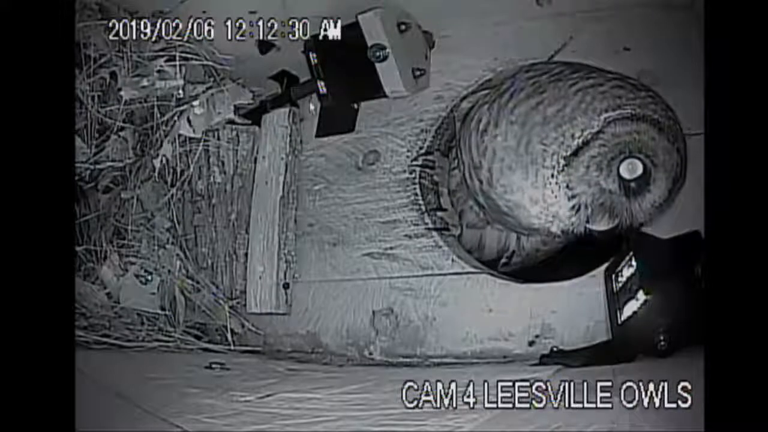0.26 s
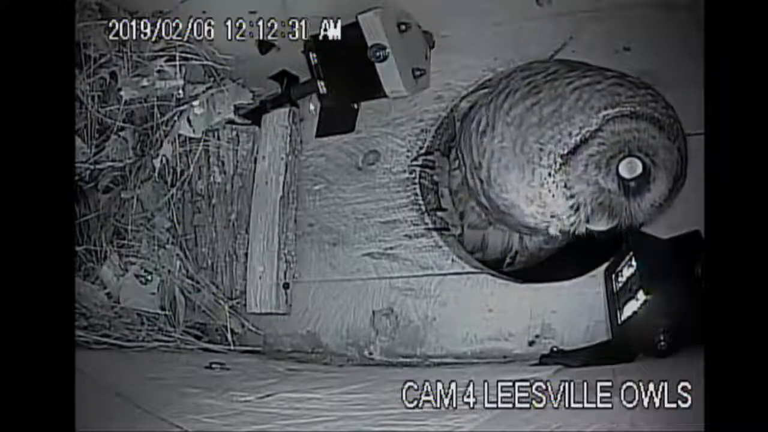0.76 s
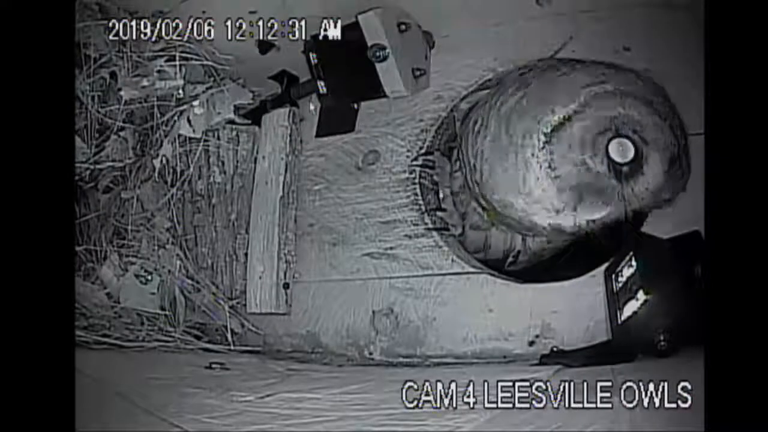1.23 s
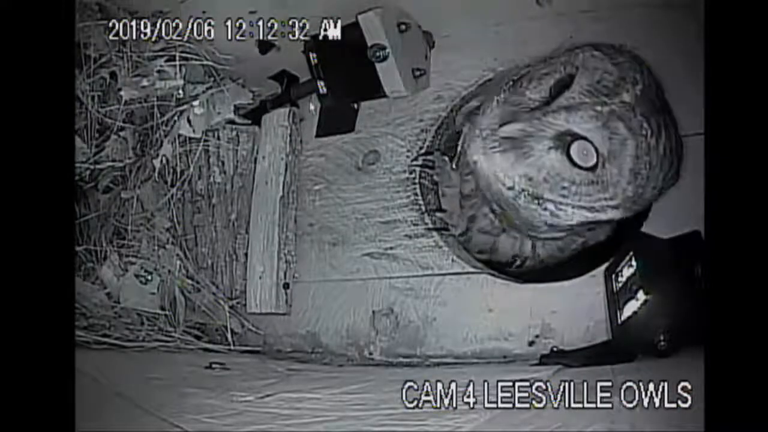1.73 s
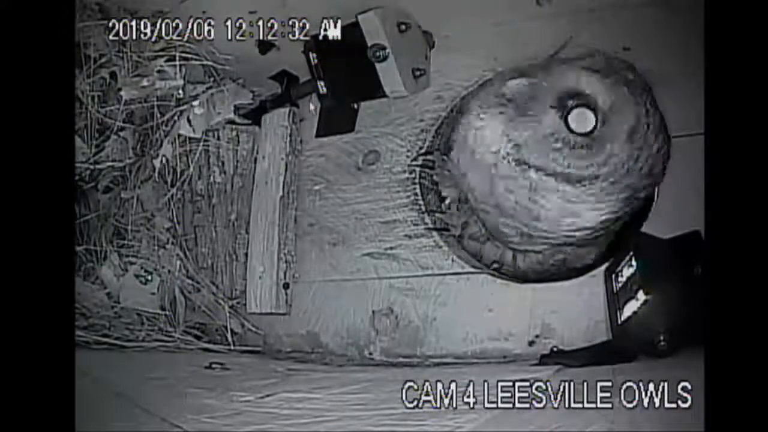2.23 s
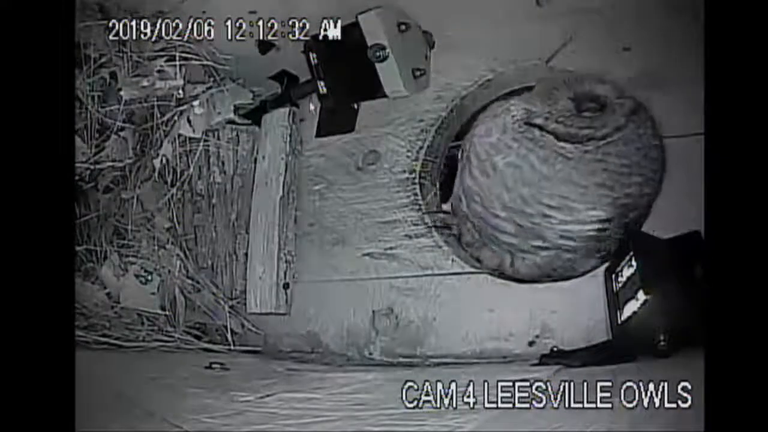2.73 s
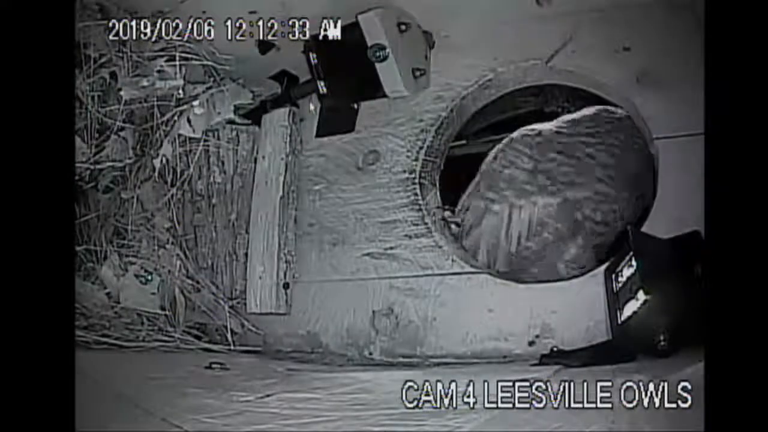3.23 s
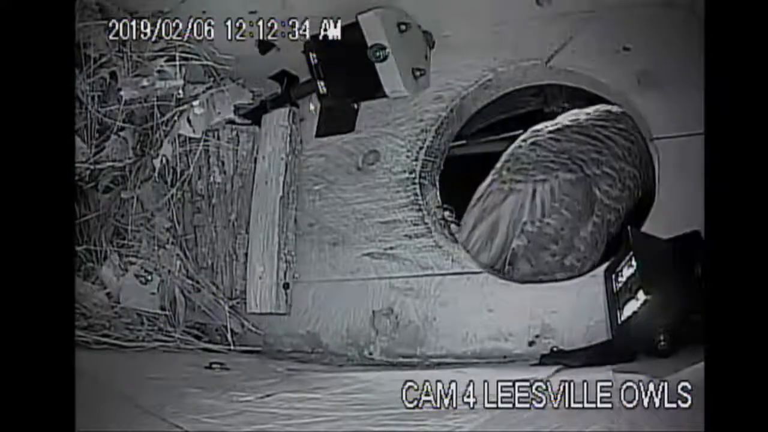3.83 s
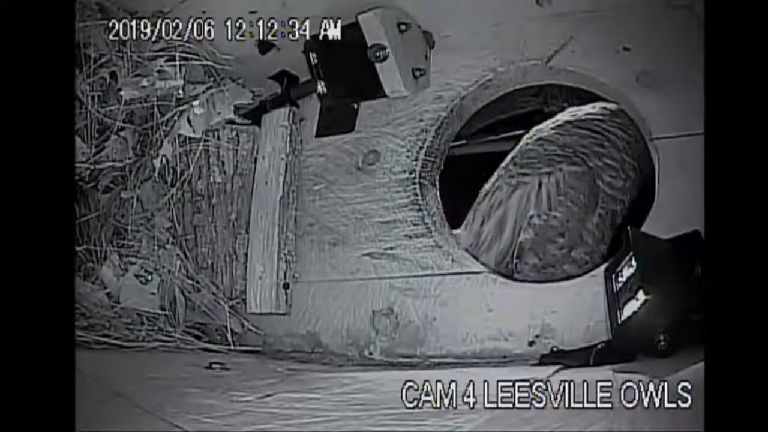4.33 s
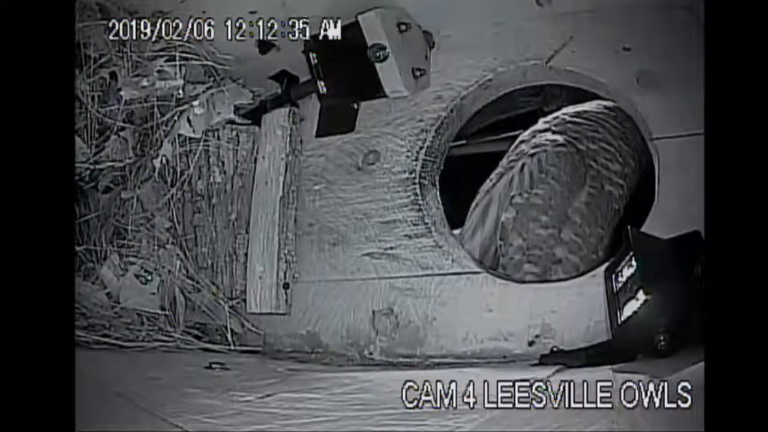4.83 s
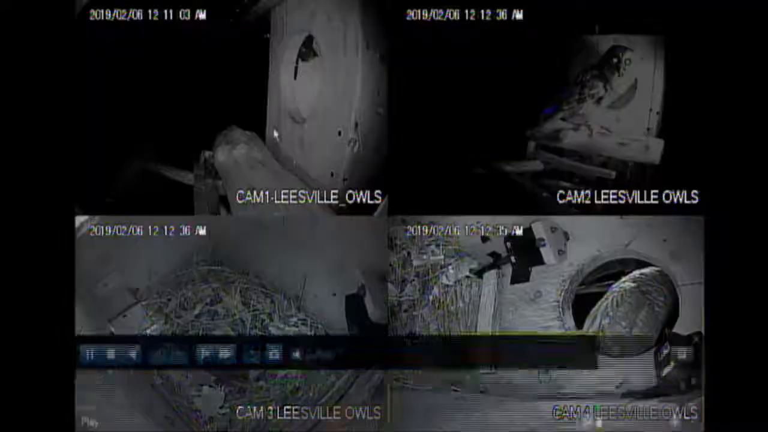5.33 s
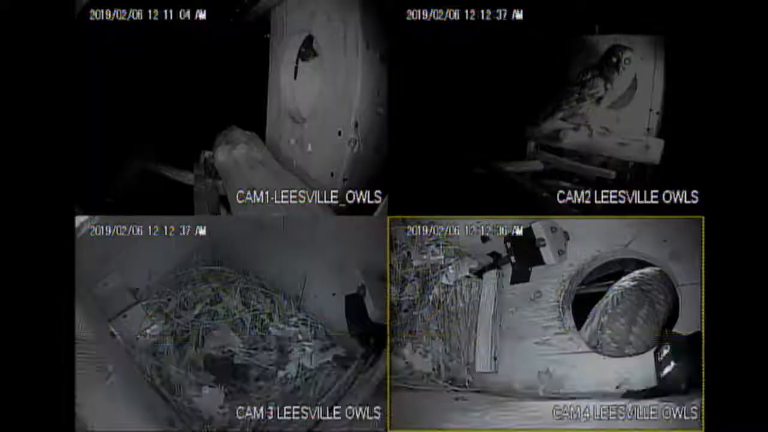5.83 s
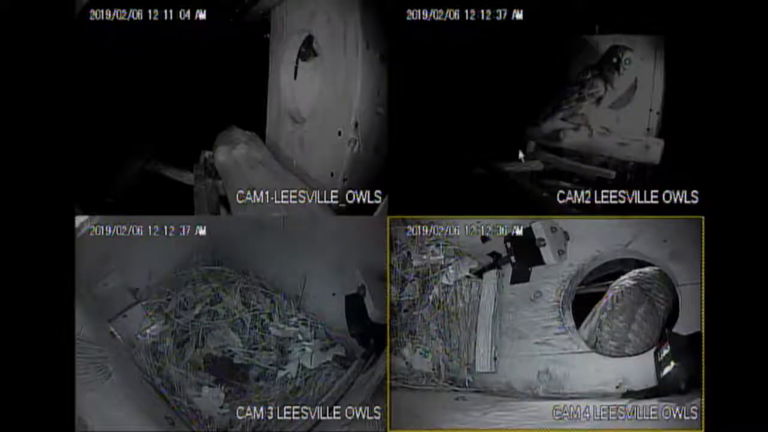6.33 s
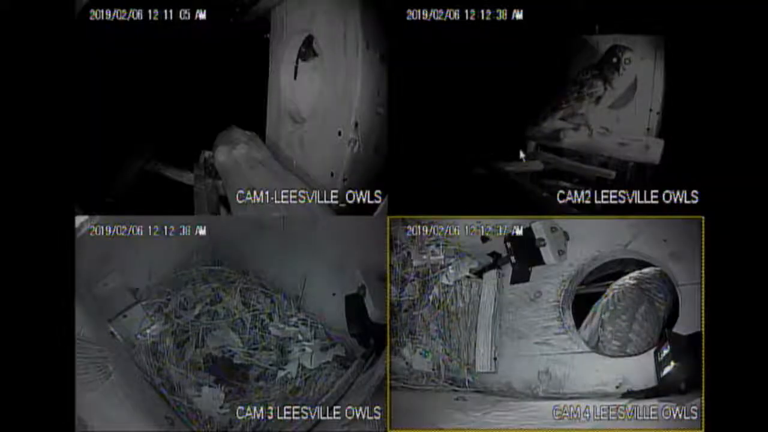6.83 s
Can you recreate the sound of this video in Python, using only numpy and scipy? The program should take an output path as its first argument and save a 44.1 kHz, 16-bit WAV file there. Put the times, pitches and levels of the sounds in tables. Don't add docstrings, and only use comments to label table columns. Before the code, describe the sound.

Loud, overloaded owl hoots in a boxy wooden space, claws knocking and scraping as it turns, then a longer, softer run of hoots outward.

```python
import sys
import numpy as np
from scipy import signal
from scipy.fft import rfft, irfft, next_fast_len
from scipy.io import wavfile
from scipy.ndimage import uniform_filter1d, map_coordinates

SR = 44100
rng = np.random.default_rng(int(sys.argv[2]) if len(sys.argv) > 2 else 0)


def gain_from_decibels(decibels):
    exponent = np.asarray(decibels, float) / 20
    return 10 ** exponent


def unload_audio(sound):
    columns = np.transpose(np.atleast_2d(sound))
    steps = np.round(np.clip(columns, -1, 1) * 32767)
    wavfile.write(sys.argv[1], SR, steps.astype(np.int16))


N = 311346


def unit(x):
    return x / np.sqrt(np.mean(x ** 2) + 1e-20)


def filtered(x, response):
    m = next_fast_len(N + SR // 2)
    return irfft(rfft(x, m) * response(np.fft.rfftfreq(m, 1 / SR)), m)[..., :N]


def modes(table):
    def response(f):
        total = 0
        for k, (centre, width_hz, db) in enumerate(table):
            push = 1j * f * width_hz
            total = total + (-1) ** k * gain_from_decibels(db) * push / (centre * centre - f * f + push)
        return total
    return response


def wobble(rate):
    knots = rng.standard_normal(int(N * rate / SR) + 4)
    return map_coordinates(knots, [np.arange(N) * rate / SR])


def night():
    # (frequency [Hz], level per Hz [dB])
    hiss_colour = [(20, -9), (140, -13.5), (350, -17), (480, -10), (750, -17.5), (3400, -26), (4200, -33.5),
                   (15700, -48.5)]
    # (frequency [Hz], level [dB])
    hum_lines = [(242.2, -90), (479.1, -89.5), (597.5, -95.5), (839.8, -95)]
    # (middle [s], half length [s], level over the rumble [dB])
    sways = [
        (.02, .5, 4.5),
        (2.906, .3, 12),
        (3.889, .26, 14),
        (5.45, 1, 5),
    ]
    t = np.arange(N) / SR
    f, db = np.transpose(hiss_colour)
    hiss = unit(filtered(rng.standard_normal(N), lambda hz: gain_from_decibels(np.interp(np.log(hz + 1), np.log(f), db))))
    rumble = unit(filtered(rng.standard_normal(N), lambda hz: modes([(75, 36, 0)])(hz) ** 2))
    throb_db = 3 * wobble(12)
    sway_db = sum(db * np.exp(-((t - middle) / half) ** 2) for middle, half, db in sways)
    hum = sum(gain_from_decibels(db + 16.5 + 2 * wobble(13)) * np.sin(2 * np.pi * hz * t) for hz, db in hum_lines)
    return gain_from_decibels(-61) * hiss + gain_from_decibels(-64 + sway_db + throb_db) * rumble + hum


def claws():
    # (time [s], peak level [dB], bright share [dB], scrape length [s])
    taps = [(2.248, -36, -9.5, 0.014), (2.309, -42.5, -25, .014), (2.343, -39, -22, 0.023),
            (2.42, -38.5, -12, .007), (2.44, -29.5, -38, 0.022), (2.524, -48, -12, 0.015),
            (2.76, -26.5, -5.5, 0.019), (2.874, -16, -16, 0.012), (2.922, -13.5, -15, 0.0154),
            (3.072, -22.5, -20, .014), (3.35, -39, -43, 0.024), (3.697, -49, -12, .01),
            (4.049, -31, -14, .0078)]
    # (time [s], peak level [dB], bright share [dB], scrape length [s])
    thuds = [(2.218, -58, -15, 0.012), (2.601, -30.5, -19, 0.011), (2.736, -41, -25, 0.042),
             (2.945, -22, -22, 0.027), (3.034, -34, -29, 0.012), (3.777, -48.5, -10, 0.008),
             (3.967, -52, -7, 0.075), (4.334, -48, -30, 0.0193)]
    # (time [s], peak level [dB], bright share [dB], scrape length [s])
    drags = [(2.374, -42, -14, 0.0267), (2.566, -28, -4, 0.019), (2.656, -44.5, -34, 0.04),
             (2.821, -19, -7.5, 0.021), (3.137, -45.5, -35, 0.075), (4.03, -38, -15, .016),
             (4.172, -31, -8, 0.022), (4.19, -32, -8, .015)]
    # (frequency [Hz], width [Hz], level [dB])
    walls = [(460, 27, 17.5), (692, 37, 14), (930, 130, 3), (1274, 69, 11), (1500, 360, -2.5),
             (2297, 300, 12), (2624, 130, -26), (2800, 59, -18)]
    # its rows, rise in s, dull share in dB
    kinds = [(taps, 0.0014, -12.5), (thuds, 0.001, 0.81), (drags, 0.0073, -12)]
    bands = np.zeros((3, N + SR))
    t = np.arange(SR // 5) / SR
    for rows, rise, dull_db in kinds:
        for start, db, bright_db, length in rows:
            span = np.clip(length, .004, .1)
            unevenness_db = 24 * uniform_filter1d(rng.standard_normal(len(t)), size=90)
            grains = rng.standard_normal(len(t)) * gain_from_decibels(unevenness_db)
            after = np.clip(t - rise, 0, None) / span / np.array([[1.2], [1], [.6]])
            shape = np.clip(t / rise, 0, 1) * np.exp(-after)
            tick = gain_from_decibels(18) * np.exp(-rise / 0.0013 - t / 0.00025) * rng.standard_normal(len(t))
            shares = gain_from_decibels([[dull_db + 7.5], [9], [bright_db + 5.5]])
            first = round(start * SR)
            bands[:, first:first + len(t)] += shares * gain_from_decibels(db) * (shape * grains + tick)
    low = lambda f: 1 / (1 + (f / 800) ** 6)
    high = lambda f: 1 - 1 / (1 + (f / 1700) ** 6)
    split = filtered(bands[:, :N], lambda f: np.array([low(f), 1 - low(f) - high(f), high(f)]))
    direct = lambda f: (1j * f / (250 + 1j * f)) ** 2
    return filtered(split.sum(axis=0), lambda f: gain_from_decibels(-3.5) * modes(walls)(f) + gain_from_decibels(-5.0) * direct(f))


def scatter(x, t60, wet_db, above_hz):
    t = np.arange(SR // 2) / SR
    tail = rng.standard_normal(len(t)) * gain_from_decibels(-60 * t / t60) * (1 - np.exp(-t / 0.0027))
    scattered = filtered(x, lambda f: 1 / (1 + (above_hz / (f + 1)) ** 6))
    return x + gain_from_decibels(wet_db) * signal.fftconvolve(scattered, tail / np.linalg.norm(tail))[:N]


def breath(hoots, last, low_hz, end_hz, climb, onset, full_db, db_per_octave):
    full_hz, release_s = 340.6, 0.018
    t = np.arange(N) / SR
    s, hz, db = np.transpose(last)
    pitch = uniform_filter1d(np.interp(t, s, hz), size=700)
    fades = np.clip((t - s[0]) / onset, 0, 1) * np.clip((s[-1] - t) / release_s, 0, 1)
    gain = fades * gain_from_decibels(np.interp(t, s, db))
    for start, rise, fall, top_hz in hoots:
        inside = (t >= start) & (t < start + rise + fall)
        u = t[inside] - start
        effort = top_hz / full_hz
        sinking = np.clip((u - rise) / fall, 0, 1)
        still_to_climb = np.clip(1 - u / rise, 0, 1) ** climb
        dropped = sinking ** (1.32 / effort ** .55)
        pitch[inside] = top_hz - (top_hz - low_hz) * still_to_climb - (top_hz - end_hz) * dropped
        strength = gain_from_decibels(full_db + db_per_octave * np.log2(effort))
        gain[inside] = strength * np.clip(u / onset, 0, 1) * (1 - sinking ** 2.98)
    return pitch, gain


def owl(pitch, gain, box, ring, tilt_db, slack_db):
    on = gain > 1e-6
    shaky_pitch = pitch * (1 + .004 * wobble(90))
    phase = 2 * np.pi * np.cumsum(shaky_pitch)[on] / SR
    k = np.arange(1, 25)[:, None]
    slack = np.clip(1 - pitch[on] / 260, 0, 1)
    slack_loss_db = slack_db * slack * np.log2(np.maximum(k * pitch[on] / 600, 1))
    tone = np.sum(gain_from_decibels(tilt_db * np.log2(k) + slack_loss_db) * np.cos(k * phase), axis=0)
    air = gain_from_decibels(-24) * (1 + np.cos(phase)) * rng.standard_normal(len(phase))
    voice = np.zeros(N)
    voice[on] = tone + air
    beak = lambda f: (1j * f / (270 + 1j * f)) ** 3 / np.sqrt(1 + (275 / (f + 1)) ** 7)
    shimmer = gain_from_decibels(.6 * wobble(45))
    return filtered(voice * gain * shimmer, lambda f: beak(f) * 2 * (modes(box)(f) + modes(ring)(f)))


def hoots_into_box():
    # (start [s], rise [s], fall [s], top pitch [Hz])
    short_in = [
        (.088, 0.037, 0.05, 231),
        (.39, .044, 0.0463, 278),
        (.715, 0.046, 0.051, 296.3),
        (1.04, 0.052, 0.056, 304),
        (1.362, .06, .061, 342.8),
        (1.692, 0.051, 0.072, 339),
    ]
    # (time [s], pitch [Hz], level [dB])
    long_in = [(1.858, 124.6, -5.5), (1.899, 253.9, -3), (1.935, 295.2, -1), (1.973, 307.2, -2.5),
               (2.012, 283.8, -2), (2.041, 248.1, -4), (2.065, 199.1, -6.5), (2.1, 156.1, -7.5),
               (2.15, 109.6, -22.5)]
    # (frequency [Hz], width [Hz], level [dB])
    box_in = [(325, 27, -7), (259, 34, -18.5), (465.89, 37.6, 10.5), (570, 150, 1.5), (689.3, 35, -1.5),
              (995, 100, -8.5), (1221, 76, -12), (1447, 77, -13.5), (2300, 560, -24)]
    # (frequency [Hz], width [Hz], level [dB])
    ring_in = [(467, 6, -13), (948, 16, -23)]
    pitch, gain = breath(short_in, long_in, low_hz=120.53, end_hz=105.23, climb=1.7, onset=0.015,
                         full_db=-2.5, db_per_octave=5.5)
    voice = owl(pitch, gain, box_in, ring_in, tilt_db=-4.5, slack_db=-19.5)
    near = scatter(voice, t60=0.03, wet_db=-1.5, above_hz=638)
    return scatter(near, t60=0.083, wet_db=-32, above_hz=200)


def hoots_into_night():
    # (start [s], rise [s], fall [s], top pitch [Hz])
    short_out = [
        (3.468, 0.036, .054, 163.3),
        (3.791, 0.038, 0.049, 216),
        (4.089, .049, 0.049, 254.8),
        (4.396, .05, 0.056, 276.7),
        (4.72, 0.049, 0.05954, 288.1),
        (5.065, .05, .059, 316.4),
        (5.385, 0.059, 0.054, 341.9),
        (5.721, 0.061, 0.056, 346.6),
    ]
    # (time [s], pitch [Hz], level [dB])
    long_out = [(5.946, 135.2, -10.5), (5.982, 266.3, -9), (6.016, 325, -12.5), (6.048, 339.6, -9.5),
                (6.096, 303, -14), (6.14, 261.5, -9.5), (6.188, 189.6, -14), (6.235, 157.3, -15),
                (6.285, 111.5, -31.5)]
    # (frequency [Hz], width [Hz], level [dB])
    box_out = [(350.7, 8.1, -14), (230.4, 6, -21.5), (480.2, 34.3, 12), (665, 130, -9), (967, 40, -11.5),
               (1420, 300, -17.5), (2020, 250, -43), (3440, 50, -30)]
    # (frequency [Hz], width [Hz], level [dB])
    ring_out = [(555, 13, 1), (474, 6, -9)]
    pitch, gain = breath(short_out, long_out, low_hz=121.63, end_hz=104.64, climb=1.7, onset=0.022,
                         full_db=-9.0, db_per_octave=6.5)
    voice = owl(pitch, gain, box_out, ring_out, tilt_db=-7.0, slack_db=-8.5)
    near = scatter(voice, t60=0.038, wet_db=-2.0, above_hz=435)
    return scatter(near, t60=0.22, wet_db=-20.5, above_hz=480)


def scene():
    return np.array([hoots_into_box() + hoots_into_night() + claws(), night()])


def overload(x, top, bottom, hardness):
    limit = np.where(x > 0, top, bottom)
    return x / (1 + np.abs(x / limit) ** hardness) ** (1 / hardness)


def band_limit(x):
    return signal.sosfilt(signal.butter(12, 15960, fs=SR, output="sos"), x)


def record(dry):
    sampling_hz = 8000
    t = np.arange(N) / SR
    slide = 0.38 * np.clip(uniform_filter1d(np.abs(dry[0]), size=500) - .12, 0, None)
    clipped = overload(dry[0] - slide, top=0.41, bottom=0.35, hardness=8)
    steep = lambda f: (25 + 1j * f) / (80 + 1j * f) / (1 + 1j * f / 2600) / np.sqrt(1 + (f / 3550) ** 26)
    narrow = filtered(clipped, steep)
    clock = np.cos(2 * np.pi * sampling_hz * t)
    mirror = filtered(narrow, lambda f: 1 / (1 + (f / 900) ** 4)) * clock
    played = overload(narrow, top=.48, bottom=.46, hardness=24)
    edges = overload(dry[0], top=.6, bottom=.6, hardness=40)
    rasp = filtered(edges - dry[0], lambda f: 1 / (1 + (4200 / (f + 1)) ** 12))
    left = played + gain_from_decibels(-12) * rasp + gain_from_decibels(-48.5) * mirror + dry[1] + gain_from_decibels(-95.0) * clock

    def crosstalk(f):
        early = np.exp(2j * np.pi * f * 1.5e-5)
        return -gain_from_decibels(-34.5) * 1j * f / (55 + 1j * f) * (1 + f / 9000) * early

    leak = filtered(narrow + dry[1], crosstalk)
    own_hiss = gain_from_decibels(-99) * filtered(rng.standard_normal(N), lambda f: 1 / (1 + 1j * f / 6000))
    right = leak + gain_from_decibels(-72.5) * mirror + gain_from_decibels(-96.5) * clock + own_hiss
    return band_limit(np.array([left, right]))


dry = scene()
out = record(dry)
unload_audio(out)
```